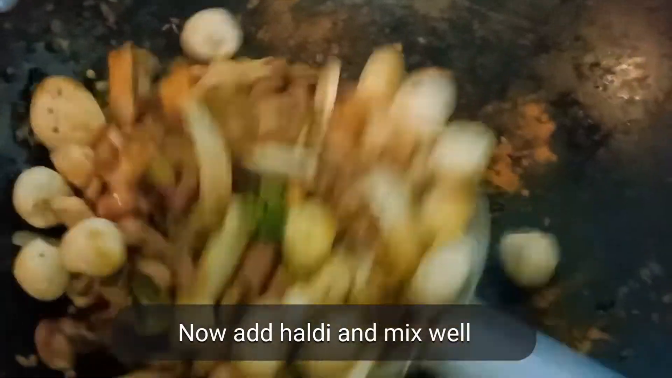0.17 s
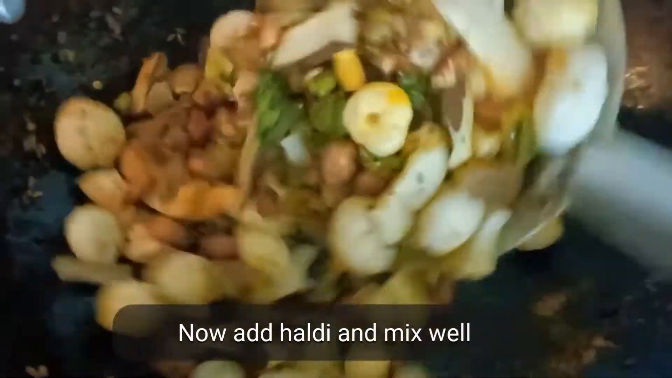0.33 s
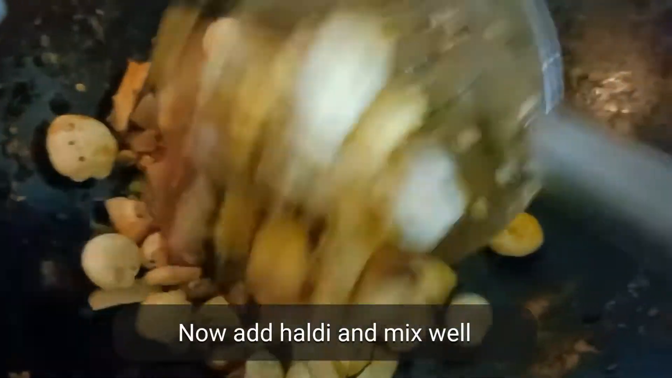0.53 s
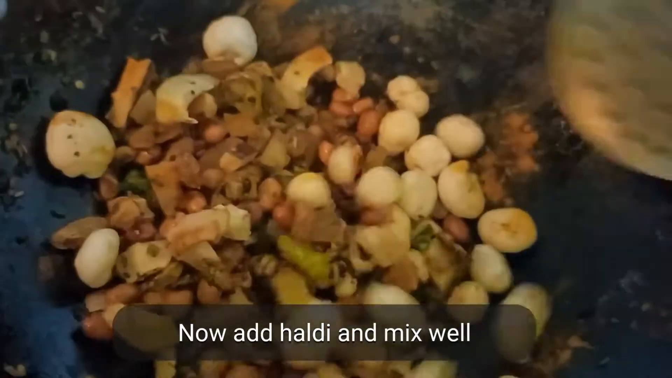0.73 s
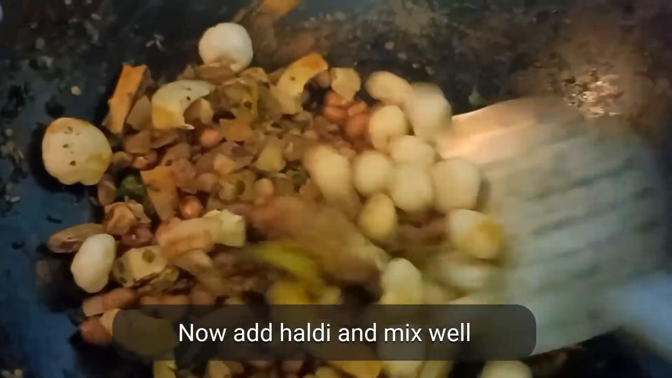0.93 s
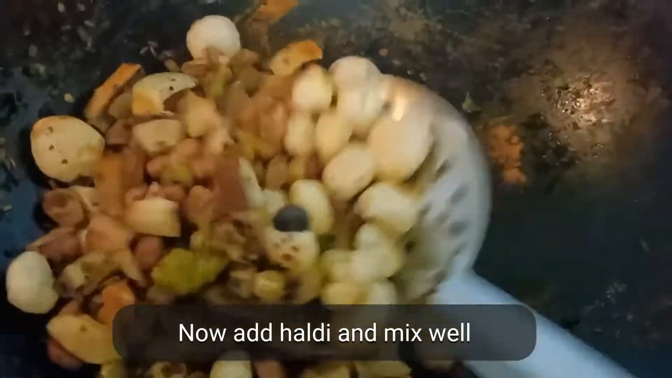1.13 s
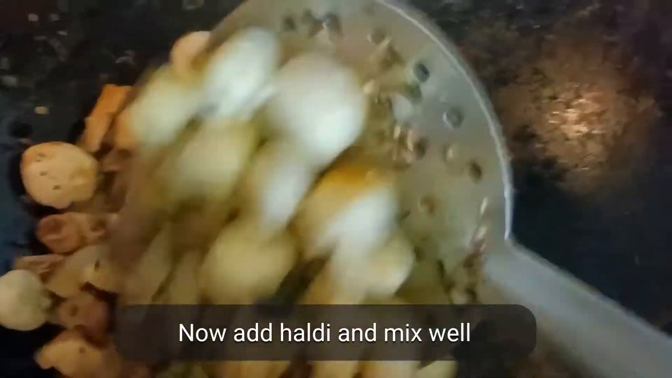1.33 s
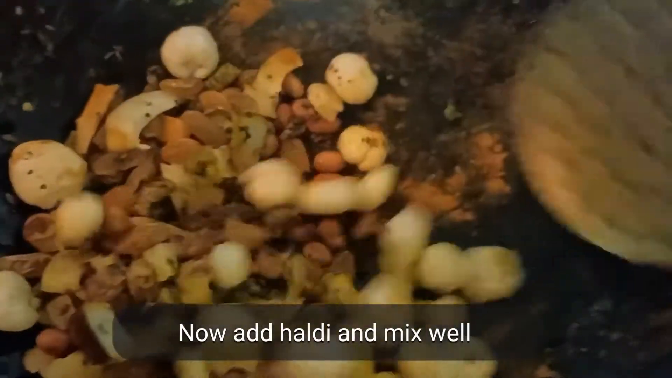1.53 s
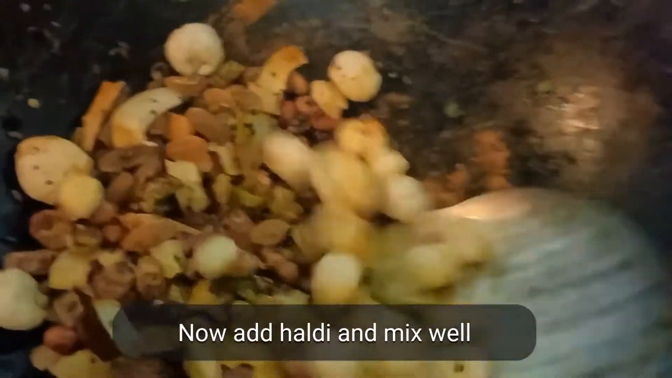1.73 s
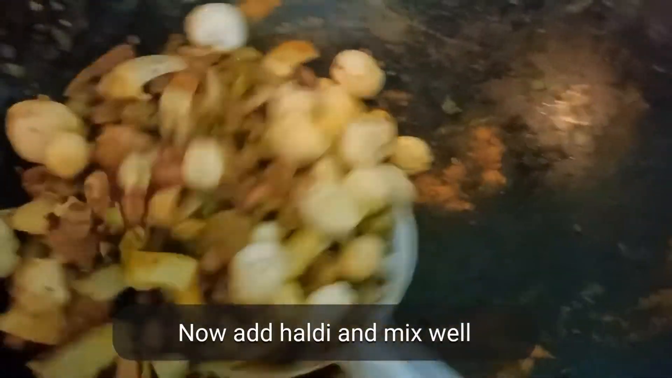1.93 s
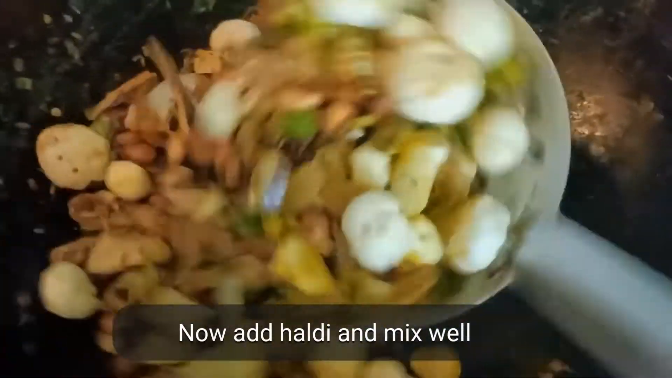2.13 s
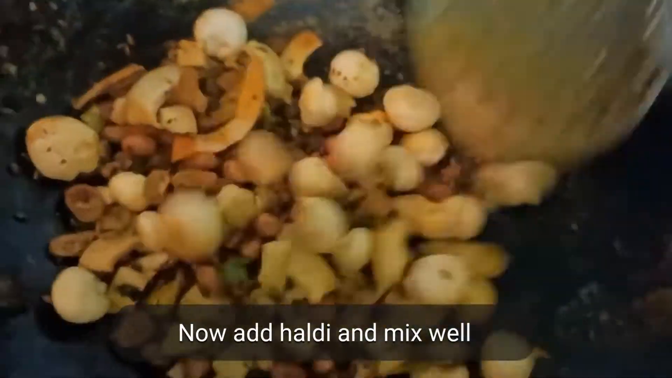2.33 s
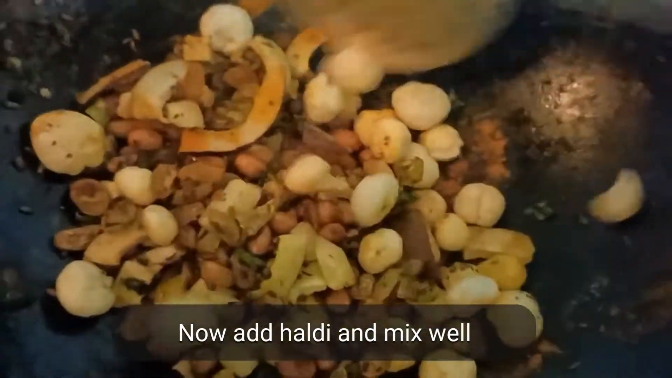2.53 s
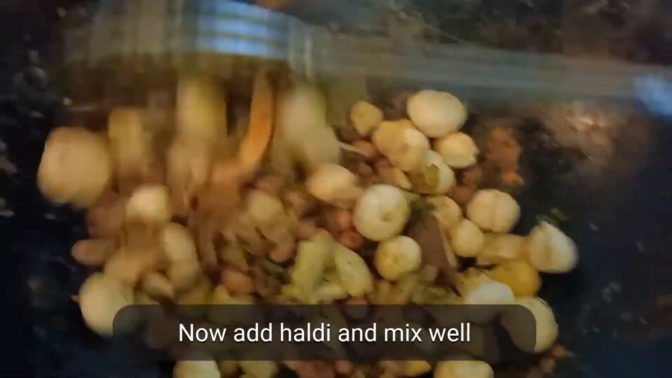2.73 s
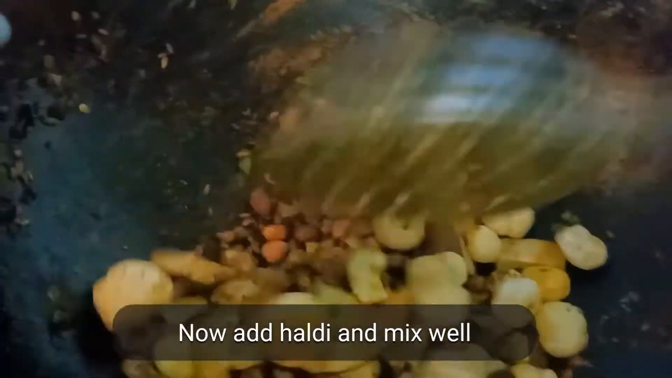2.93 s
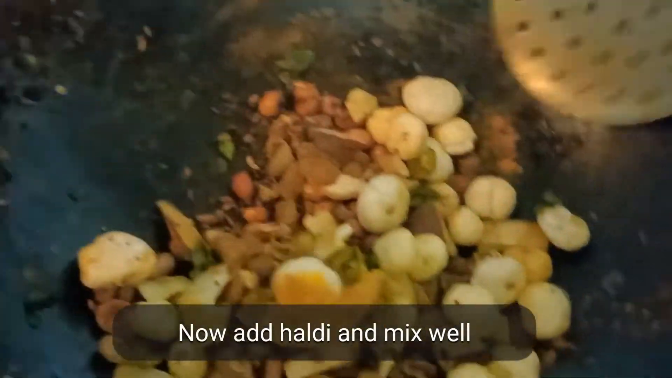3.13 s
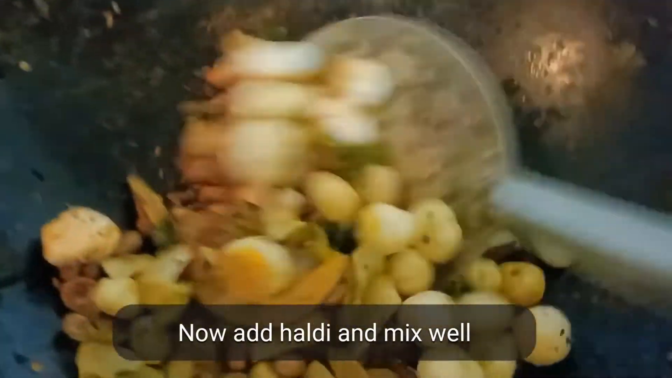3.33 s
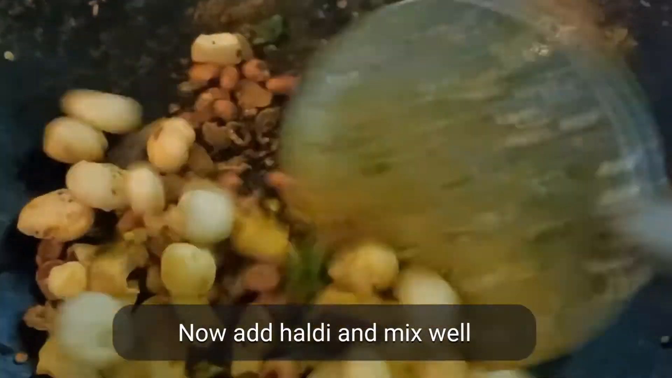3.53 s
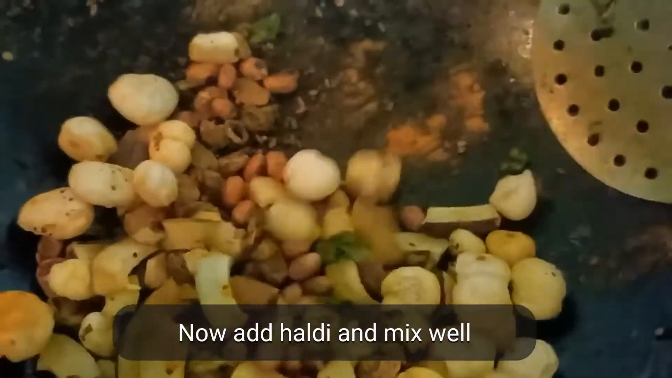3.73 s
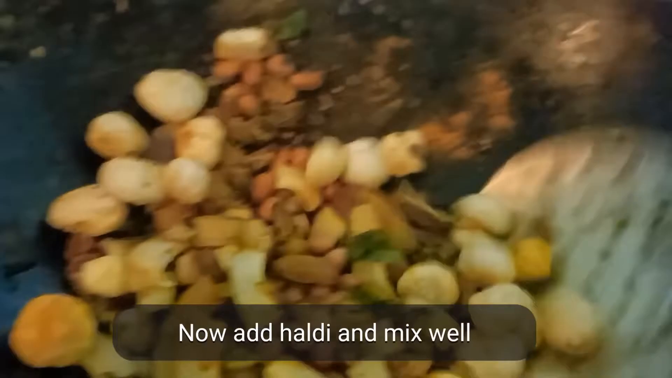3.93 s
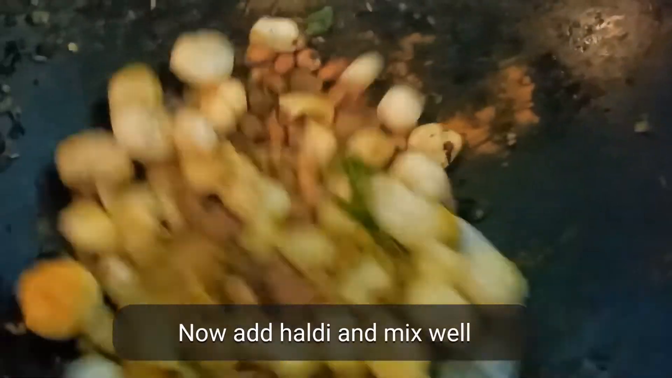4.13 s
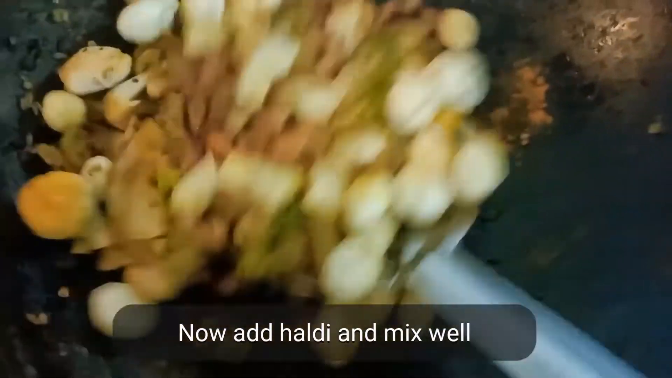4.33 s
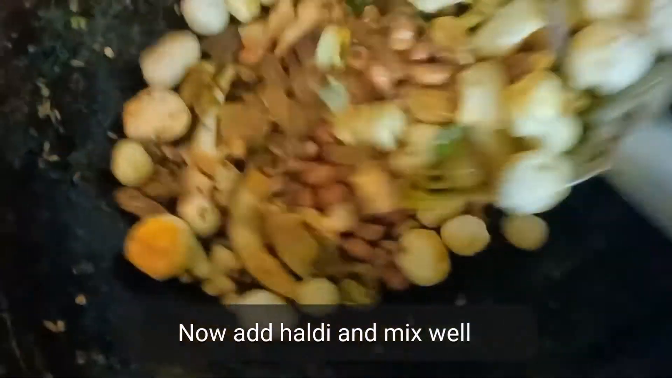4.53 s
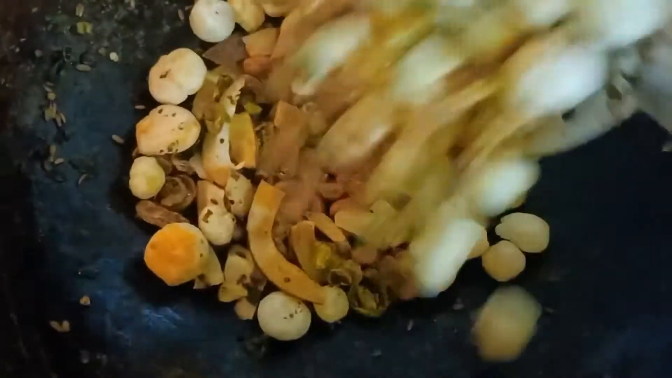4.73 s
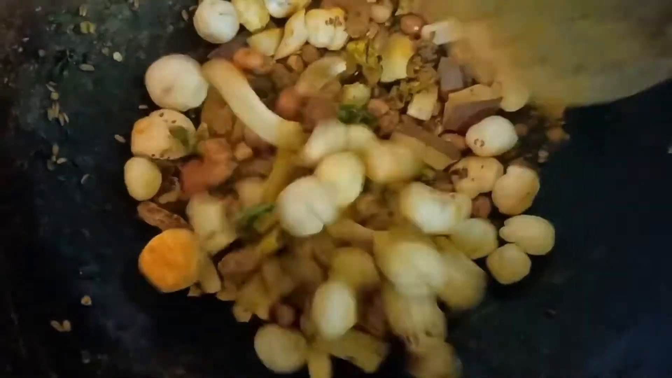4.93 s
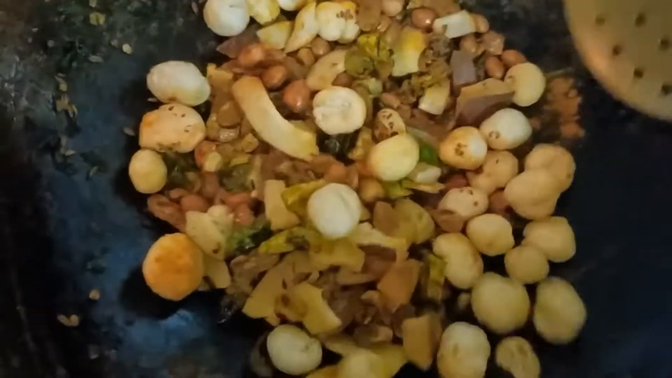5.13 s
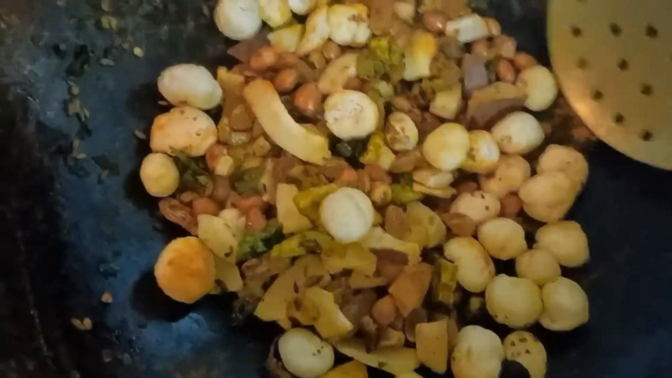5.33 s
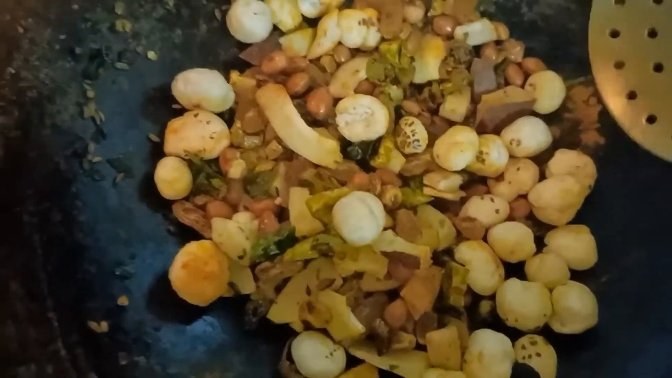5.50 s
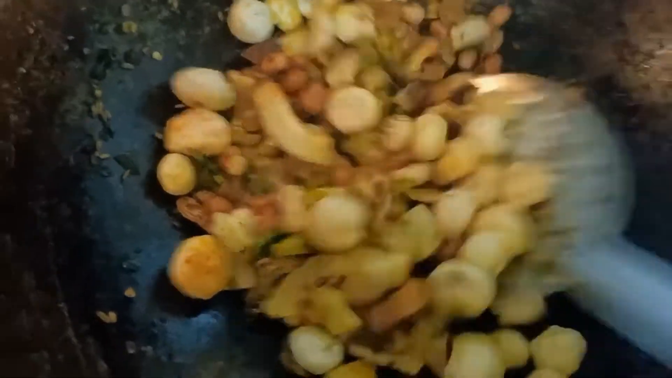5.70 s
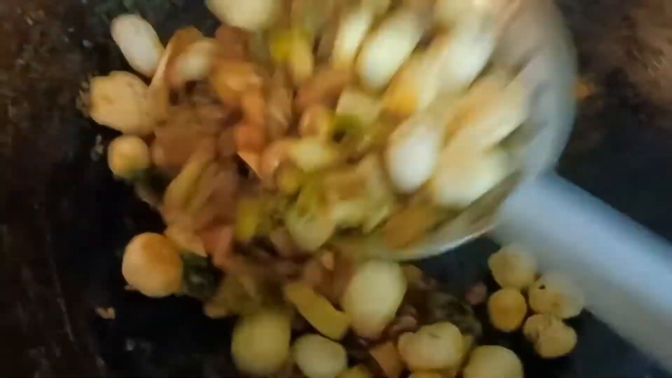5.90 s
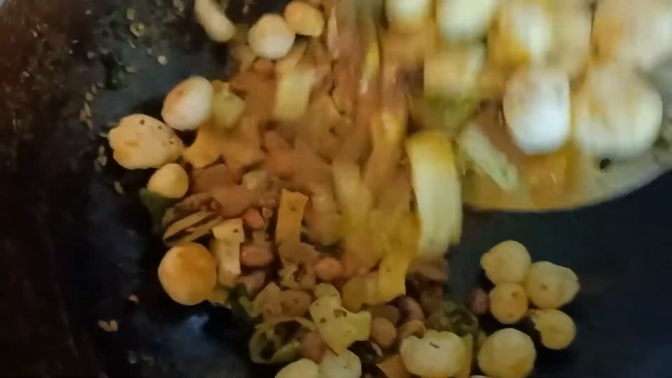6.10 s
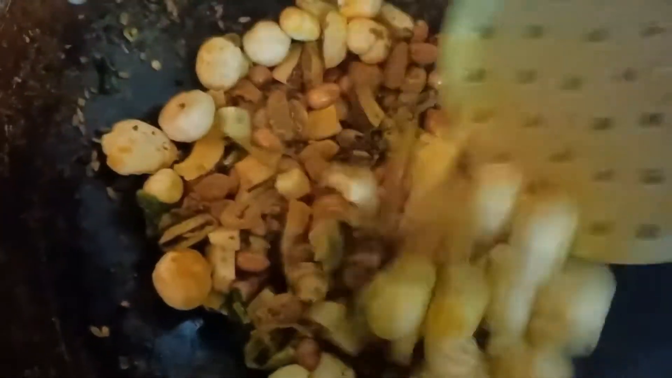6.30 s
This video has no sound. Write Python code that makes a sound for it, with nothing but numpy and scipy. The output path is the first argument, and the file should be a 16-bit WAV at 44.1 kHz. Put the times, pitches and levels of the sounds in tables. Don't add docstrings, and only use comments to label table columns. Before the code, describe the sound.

A steel spatula slaps and scrapes a hot metal pan, turning nuts and dry coconut that clatter, tick and tumble in a quiet kitchen.

```python
import sys
import numpy as np
from scipy import signal
from scipy.fft import rfft, irfft, next_fast_len
from scipy.io import wavfile
from scipy.ndimage import uniform_filter1d

SR = 44100
rng = np.random.default_rng(int(sys.argv[2]) if len(sys.argv) > 2 else 0)


def wav_out(sig):
    wavfile.write(sys.argv[1], SR, np.round(np.clip(np.atleast_2d(sig).T, -1, 1) * 32767).astype(np.int16))


def level_to_linear(level):
    exponent = np.asarray(level, float) / 20
    return 10 ** exponent


N = 284826
SIZE = next_fast_len(N + SR // 2)
HZ = np.fft.rfftfreq(SIZE, 1 / SR)

# frequency in Hz, level in dB per Hz.
KITCHEN = [(12, -35), (20, -8), (36, -1.5), (53, -17), (70, -5), (130, -5.5), (177, -14.5), (262, -20.5),
           (301, -17.5), (337, -25), (678, -24), (3500, -25), (10500, -31), (16000, -24)]
# frequency in Hz, likeness from 0 to 1.
ALIKE = [(30, 1), (100, 0.88), (300, 0.93), (1000, 0.56), (3400, 0.22), (5500, 0.19), (8000, 0.36),
         (12000, 0.7), (15000, 0.36)]
# frequency in Hz, left over right in dB.
LEAN = [(100, 0), (250, 2), (700, 2.5), (1400, -0.5), (5000, 0.5), (10000, -1)]
# start in seconds, peak in dB, pitch in Hz, left over right in dB.
CRUMBS = [(0.328, -40, 5200, 0), (0.627, -27, 11000, 0), (0.627, -33, 3500, -6), (0.938, -22, 6000, 0),
          (1.479, -34, 10000, 0), (1.5103, -28, 12000, -10), (1.5494, -31, 13800, -10),
          (2.12, -36, 12000, -2), (2.415, -36, 5000, -3), (2.4369, -27, 10500, 3), (3.083, -42, 12500, 2),
          (3.1004, -42, 10500, 6), (3.127, -42, 6900, 8), (3.465, -30, 14500, 0), (3.471, -27, 8000, 0),
          (3.471, -29, 12000, 0), (3.5275, -32, 3000, -4), (3.547, -31, 3200, 1), (3.81, -32, 2600, 5),
          (4.5425, -30, 2920, 8), (4.688, -28, 4100, -2), (4.8618, -19, 4200, 0), (4.914, -32, 13500, 0),
          (4.947, -25, 12500, 0), (4.969, -28, 13100, 0), (5.002, -29, 2400, 8), (5.094, -33, 12500, -2),
          (5.1376, -32, 5400, 4), (5.1376, -33, 11500, 0), (6.1728, -30, 5800, 6)]
# start in seconds, peak in dB.
SEEDS = [(0.0143, -20.5), (0.383, -37), (0.4184, -47), (0.559, -35), (0.636, -19), (0.665, -29),
         (0.689, -34), (0.7377, -36), (0.9625, -18), (1.0203, -16), (1.328, -34), (1.348, -45),
         (1.402, -34.5), (1.524, -31.5), (1.774, -19), (1.8355, -23), (2.2512, -28), (2.363, -31),
         (2.3826, -24), (3.3476, -22), (3.633, -31.5), (3.756, -39), (3.8275, -11), (3.9858, -40),
         (4.8604, -21), (4.9342, -20.5), (5.9023, -40), (6.341, -31), (6.392, -17.5), (6.35, -32),
         (6.43, -26.5)]
# start in seconds, peak in dB, # pitch
# in Hz, 60 dB decay in seconds, left over right in dB.
STEEL_TAPS = [(0.3279, -31, 5290, 0.16, 12), (0.328, -29, 5850, 0.082, 2), (0.328, -33, 6400, 0.066, 4),
              (0.329, -38, 4840, .08, 6), (0.419, -23, 5500, 0.015, 0), (1.3277, -9.5, 1835, 0.009, -3.5),
              (1.525, -21, 11000, 0.012, -3), (1.9924, -12.5, 10000, 0.0079, -4), (1.993, -14, 12200, .006, -4),
              (2.2531, -5, 4430, 0.004, 13.5), (2.439, -24.5, 2380, 0.016, 15), (3.47, -13, 5530, 0.0088, -1.5),
              (3.547, -16.5, 2100, 0.0041, -12), (3.606, -27, 5800, 0.012, -3), (3.7097, -25.5, 5900, 0.014, 1),
              (3.8266, -9, 3690, 0.038, 15), (4.0368, -6, 6290, 0.012, -3), (4.195, -8, 6700, 0.0086, 3),
              (4.203, -25.5, 1346, 0.051, 4), (4.5435, -34, 4800, 0.099, 24), (4.687, -29.5, 4840, 0.11, 12),
              (4.687, -30, 5390, 0.072, 1), (4.687, -27, 4300, 0.031, 14), (4.689, -30.5, 6300, 0.045, 2),
              (4.5433, -33, 7200, 0.033, 14), (4.837, -34, 7360, 0.056, 15), (4.94, -15, 5390, 0.069, 5),
              (4.944, -20, 4840, 0.096, 8), (4.946, -12.5, 2500, .012, -11), (3.22, -24, 3650, 0.16, 6),
              (4.809, -36, 7340, 0.031, 24), (4.8618, 0.5, 10260, 0.0022, -7), (4.8618, -11, 13500, 0.003, -2),
              (4.8618, -18, 6500, 0.0026, -7), (5.5952, -27, 4460, 0.026, 6), (5.931, -32, 3004, 0.064, 12),
              (6.29, -28, 11300, 0.015, -1.0), (6.381, 0.5, 2310, 0.0031, 2), (6.427, -19, 10660, 0.023, 4),
              (3.2175, -19, 11900, .012, 2),
    (3.218, -18, 4900, .02, 0),
    (3.2385, -22, 4400, .03, -2),
    (5.5135, -18.5, 4500, 0.033, 8),
    (5.514, -15.5, 7600, 0.019, 7),
    (5.513, -17, 11750, 0.053, -10),
    (5.518, -32, 3400, 0.15, 10),
    (5.515, -18, 5900, .025, 2),
]
# start in seconds, peak in dB, thump relative to it in dB,
# bottom ring relative to it in dB, clack pitch in Hz.
LANDINGS = [
    (0.8388, -9, -31, -27, 6290),
    (1.0843, -12, -17, -46, 5720),
    (1.67, -9, -12, -31.5, 4366),
    (2.4935, -16, -30, -23, 3600),
    (3.2158, -22.5, -2, -10.5, 5000),
    (3.239, -13.5, -49, -54, 5920),
    (3.8275, -13.5, -15, -26, 3870),
    (4.071, -12.5, -71, -48, 5740),
    (5.5125, -21, -14.5, -35.5, 7660),
    (5.514, -28, -40, -47, 11550),
]
# start in seconds, peak in dB, thump relative to it in dB,
# thump pitch in Hz, clack pitch in Hz.
KNOCKS = [(0.5245, -33.5, 11, 277, 3000), (0.5315, -34.5, 14.5, 546, 2300), (1.3275, -41.5, 6, 230, 1200),
          (0.556, -39, 14, 500, 2000), (0.46, -44.5, 9.5, 860, 2800), (0.576, -46.5, 9, 598, 1600),
          (0.598, -46, 10, 520, 1600), (0.94, -15.5, -45, 1600, 3150), (3.5, -49, -37, 1000, 5650),
          (4.2285, -9.5, -27, 1190, 5890), (4.9372, -14, -18, 1300, 5090)]
# mode in Hz, width in Hz, level in dB.
BOTTOM = [(204.5, 6.5, 9.5), (301, 16.6, 2), (382, 18, -8.5), (585, 43, -6), (853, 32, -13), (1110, 30, -6)]
# mode in Hz, width in Hz, level in dB.
PAN = [(214, 13.7, -6.5), (291.5, 41, -9), (385.7, 35, -5), (447, 45, -9.5), (610, 50, -5), (870, 80, -6),
       (1040, 80, -6)]
# mode in Hz, width in Hz, level in dB.
STEEL = [(5800, 46, 3.5), (3116, 130, -0.5), (3646, 49, 5.5), (6940, 33, 6.5), (4177, 32, 5),
         (4505, 36, 6.5), (4840, 14, 12.5), (5350, 13.3, 11), (5886, 32, 13.5), (6290, 69, 7),
         (11730, 60, 11), (7340, 46, 7), (8400, 79, -2.5), (8170, 54, 7.5), (9976, 74, 7), (7880, 82, 2),
         (9590, 460, 4), (11065, 64, 8), (12600, 17, -6), (11660, 400, 6), (12100, 49, 10.5),
         (15600, 230, -12)]
# frequency in Hz, level in dB per Hz.
GRIT = [(1410, -66), (2600, -1), (3350, 0), (4100, 8), (5610, 10.5), (6080, 10.5), (7230, 6), (7830, 8.5),
        (8300, 6.5), (8800, -8.5), (9500, -9), (10600, -2), (12900, 6.5), (15400, 2.5), (16000, -72)]
# frequency in Hz, level in dB per Hz.
CLATTER = [(900, -7.5), (1400, -6), (2300, 4.5), (3000, -0.5), (4000, -71)]
# frequency in Hz, level in dB per Hz.
SAND = [(6000, -35), (8500, -7), (11000, -3.5), (13200, -2.5), (15200, -4.5), (16000, -30)]
# start in seconds, rise in seconds, hold in seconds,
# level in dB, brightness in dB.
SCRAPES = [(0.0, 0.012, 0.047, -25, -0.5), (0.081, 0.013, 0.051, -30.5, -0.5),
           (0.935, 0.047, 0.037, -21.5, -4.5), (1.064, 0.0034, 0.0039, -26.5, -2),
           (1.672, 0.08, .14, -27.5, -1), (2.506, 0.082, 0.11, -28.5, 0.5),
           (2.703, 0.036, 0.13, -41.5, -6.5), (2.843, 0.035, 0.08, -48.5, 0),
           (3.268, 0.06, 0.052, -26.5, -3.5), (3.908, 0.033, 0.17, -26, -6.5),
           (4.144, 0.019, 0.017, -32.5, -7), (4.186, 0.038, 0.012, -26, -10),
           (4.902, 0.039, 0.0033, -33, -17), (5.627, 0.047, 0.055, -29.5, -2),
           (5.736, 0.015, 0.047, -36, -1.5), (2.67, 0.012, 0.076, -34.5, -2)]
# start in seconds, level in dB, brightness in dB,
# weight on the bottom in dB.
SKIDS = [
    (0.84, -27, -7.5, -9),
    (1.669, -27.5, -10, -5.5),
    (2.251, -37.5, -31, -18.5),
    (2.494, -23, -3, -13.5),
    (3.218, -28.5, -3, -3.5),
    (3.831, -25, -9, -6.5),
    (4.688, -46, -22, -11.5),
    (4.861, -41.5, 1.5, -13.5),
    (5.5135, -37, -7, -38),
    (5.593, -43.5, 1, -14.5),
]
# start in seconds, peak in dB, brightness in dB.
CATCHES = [(0.0138, -5.5, -13), (0.0324, -10, 3), (0.1004, -2.5, -13), (0.3256, -28, -16), (0.626, -28, 6),
           (0.924, -17.5, -15), (0.937, -12, -7), (0.96, -8, -8), (1.141, -21, -8), (1.479, -44, -4),
           (1.492, -45, -4), (1.505, -40, 8), (1.7734, -22, -2), (1.8354, -9, -11), (1.8964, -22, -6),
           (2.334, -35, 6), (2.342, -36, 10), (2.5627, -10, -15), (2.604, -12, -2), (2.7114, -15.5, 8),
           (3.237, -14.5, -0.5), (3.3013, -17, 0), (3.47, -28, -3), (3.5996, -33, 5), (3.7548, -38.5, 11),
           (3.921, -7.5, -9), (3.9373, -6.5, -6), (3.976, -14, 1.5), (4.036, -8, -1), (4.065, -8, -18),
           (4.092, -4, -18), (4.23, -8.5, -11), (4.9114, -23, -13), (4.938, -18, -4), (5.628, -33, 2),
           (5.64, -19, 4.5), (5.6594, -20, 6), (5.767, -14.5, -8), (6.1644, -38, -4), (6.288, -39, 13),
           (6.4268, -24, -2)]
# start in seconds, rise in seconds, hold in seconds, level in dB,
# sandy hiss relative to it in dB.
POURS = [(0.306, 0.11, 0.013, -46, -13), (0.601, 0.016, 0.01, -58, 14), (0.618, 0.0037, 0.072, -43, 6),
         (0.756, 0.016, 0.01, -47, -10), (1.468, 0.031, 0.031, -49, 7), (1.545, 0.014, 0.12, -55, 4),
         (2.086, 0.054, 0.1, -59, -11), (2.308, 0.07, 0.0082, -40.5, 3.5), (2.471, 0.014, .004, -47.5, 7),
         (3.586, 0.027, 0.054, -56, 7), (3.705, 0.02, 0.031, -63, 6), (4.054, 0.0077, 0.011, -28, -22),
         (4.473, 0.04, .004, -47, -8), (4.909, 0.019, 0.066, -45, 3.5), (4.971, 0.032, 0.013, -43.5, -0.5),
         (5.104, .02, 0.027, -58, -1), (5.82, 0.016, 0.071, -56, 3), (6.131, 0.032, 0.007, -49.5, 5),
         (6.262, 0.11, 0.062, -44.5, 1.5)]
# start in seconds, rise in seconds, hold in seconds,
# level in dB.
PRESSES = [(0.0, 0.0075, 0.11, -40.5), (0.09, 0.046, 0.37, -57.5), (0.53, 0.013, 0.092, -58),
           (0.921, 0.051, 0.044, -39), (1.072, 0.0083, 0.013, -58), (1.724, 0.029, 0.15, -46.5),
           (1.772, 0.015, 0.02, -44), (2.68, 0.011, 0.072, -51.5), (4.02, 0.022, 0.049, -70),
           (4.224, .01, 0.024, -51.5), (2.535, 0.029, 0.12, -45.5), (3.29, 0.027, 0.058, -42),
           (3.932, 0.021, 0.21, -48.5), (4.194, .04, 0.027, -60), (4.566, 0.028, 0.039, -57.5),
           (5.627, 0.064, 0.054, -46.5), (5.755, 0.025, 0.04, -50)]
# time in seconds, level in dB.
SETTLING = [(0, -51), (.5, -50.5), (.61, -55.5), (1.1, -65), (1.25, -55), (1.6, -54), (2.2, -53),
            (2.9, -51.5), (3.1, -63.5), (3.25, -77), (3.5, -53), (3.7, -54.5), (4.4, -52), (4.85, -56),
            (5.2, -69), (5.5, -66.5), (5.9, -50.5), (6.46, -57.5)]
# time in seconds, place from the pan's middle (0) up its wall (2)
CONTACT = [(0, 1.5), (.3, 1.1), (.7, 1.03), (.95, 0.52), (1.2, 0.87), (1.7, 1.1), (1.95, 1.13), (2.5, 0.92),
           (2.62, 2.76), (2.8, 2.74), (3.2, 0.72), (3.45, 0.81), (3.9, 0.72), (4.15, 0.57), (4.6, 0.9),
           (4.95, 0.49), (5.55, 1.2), (5.8, 1.54), (6.46, 0.67)]
# frequency in Hz, level in dB.
PLACES = [
    [(3000, 4.5), (4400, 3), (6200, -10), (8700, -11), (12500, 3.5)],
    [(3000, 3), (4400, 0), (6200, 1), (8700, -0.5), (12500, 0.5)],
    [(3000, -1), (4400, 0), (6200, -1.5), (8700, -5.5), (12500, -1)],
    [(3000, -6.5), (4400, -1), (6200, 5), (8700, 2.5), (12500, -3.5)],
]


def unit(x):
    return x / np.sqrt(np.mean(x ** 2) + 1e-20)


def along(points):
    f, v = np.transpose(points)
    return np.interp(np.log(HZ + 1), np.log(f + 1), v)


def filtered(x, response):
    return irfft(rfft(x, SIZE) * response, SIZE)[..., :N]


def causal(gain):
    cepstrum = irfft(np.log(gain + 1e-6), SIZE)
    cepstrum[1:SIZE // 2] *= 2
    cepstrum[SIZE // 2 + 1:] = 0
    return np.exp(rfft(cepstrum))


def modes(table, flip=-1):
    response = 0
    for k, (centre, width, db) in enumerate(table):
        resonance = 1j * HZ * width / (centre * centre - HZ * HZ + 1j * HZ * width)
        response = response + flip ** k * level_to_linear(db) * resonance
    return response


def patchy(x, depth_db, size, count=8000):
    spectrum = signal.stft(x, nperseg=size)[2]
    field = uniform_filter1d(rng.standard_normal(spectrum.shape[-2:]), size=3, axis=0)
    field = uniform_filter1d(field, size=count // size, axis=1)
    return signal.istft(spectrum * level_to_linear(depth_db * unit(field)), nperseg=size)[1][..., :N]


def grains(per_s, spread_db, smooth):
    struck = rng.random((2, N)) < per_s / SR
    sizes = level_to_linear(spread_db * rng.uniform(-0.18, 1, N)) * rng.standard_normal((2, N))
    return unit(struck * sizes) + smooth * rng.standard_normal((2, N))


def lead():
    return np.exp(1j * np.pi * np.clip(HZ / 6690, 0, 1) * np.array([[1], [-1]]))


def ports(pair):
    turn = np.arccos(np.clip(along(ALIKE), 0, 1)) / 2
    sign = np.array([[1], [-1]])
    shared, own = rfft(pair, SIZE)
    mixed = np.cos(turn) * shared + sign * np.sin(turn) * own
    return irfft(mixed * level_to_linear(sign * along(LEAN) / 2) * lead(), SIZE)[:, :N]


def sides(pan_db):
    return level_to_linear([[pan_db / 2], [-pan_db / 2]])


def room(x):
    t = np.arange(SR // 3) / SR
    tail = rng.standard_normal((2, len(t))) * level_to_linear(-60 * t / 0.19) * (t > .003)
    return signal.fftconvolve(x, tail / np.linalg.norm(tail[0]), axes=1)[:, :N]


def kitchen():
    air = filtered(rng.standard_normal((2, N)), level_to_linear(along(KITCHEN)))
    return level_to_linear(-58.5) * unit(patchy(air, depth_db=1.5, size=256))


def crumbs():
    out, t = np.zeros((2, N + SR)), np.arange(SR // 40) / SR
    for s, db, hz, pan_db in CRUMBS:
        i = round(s * SR)
        rough = unit(uniform_filter1d(rng.standard_normal(len(t)), size=8))
        tick = level_to_linear(db - 0.5 - 60 * t / 0.0035) * rough * np.sin(2 * np.pi * hz * t)
        out[:, i:i + len(t)] += sides(pan_db) * tick
    return filtered(out[:, :N], lead())


def seeds():
    taps, t = np.zeros((2, N + SR)), np.arange(SR // 50) / SR
    for s, db in SEEDS:
        i = round(s * SR)
        taps[:, i:i + len(t)] += level_to_linear(db - 16.0 - 60 * t / 0.018) * rng.standard_normal((2, len(t)))
    husk = modes([(1410, 2300, 1.4), (2460, 490, 27.0), (3850, 960, 6.0)])
    return filtered(taps[:, :N], husk)


def nuts(steel):
    tock, tick, t = np.zeros((2, N + SR)), np.zeros((2, N)), np.arange(SR // 8) / SR
    for s, db, hz, t60, pan_db in STEEL_TAPS:
        i, side = round(s * SR), sides(pan_db)
        fading = level_to_linear(-6 - 60 * t / max(t60, .002)) + level_to_linear(-51.0 - 60 * t / 0.0096)
        onset = 1 - np.exp(-t / 0.00025)
        tock[:, i:i + len(t)] += side * level_to_linear(db) * fading * onset * np.sin(2 * np.pi * hz * t)
        tick[:, i] = side[:, 0] * level_to_linear(db - 27 + rng.normal(0, 1.5, size=2))
    return filtered(tock[:, :N] + filtered(tick, steel), lead())


def landings(steel):
    burst, tones, blow = np.zeros((2, N + SR)), np.zeros((2, N + SR)), np.zeros((2, N))
    t = np.arange(SR // 8) / SR

    def wavering(depth, size):
        return 1 + depth * unit(uniform_filter1d(rng.standard_normal((2, len(t))), size=size))

    flat = [(s, db, thump, ring, 333, clack) for s, db, thump, ring, clack in LANDINGS]
    glancing = [(s, db, thump, -50, low, clack) for s, db, thump, low, clack in KNOCKS]
    for s, db, thump_db, ring_db, thump_hz, clack_hz in flat + glancing:
        i = round(s * SR)
        chatter_and_crack = level_to_linear(-60 * t / 0.018) + 1.3 * level_to_linear(-60 * t / 0.0021)
        burst[:, i:i + len(t)] += level_to_linear(db) * chatter_and_crack * rng.standard_normal((2, len(t)))
        clack = level_to_linear(db - 12.5 - 60 * t / 0.081) * wavering(1.18, size=20)
        clack = clack * np.sin(2 * np.pi * clack_hz * t)
        thump = level_to_linear(db + thump_db - 10.0 - 60 * t / 0.12) * wavering(0.53, size=150)
        thump = thump * np.sin(2 * np.pi * thump_hz * t) * (1 - np.exp(-t / 0.0014))
        tones[:, i:i + len(t)] += (clack + thump) * [[1], [.5]]
        blow[:, i] = level_to_linear(db + ring_db + 55) * np.array([1, .4])
    return level_to_linear(-23.0) * filtered(burst[:, :N], steel) + tones[:, :N] + filtered(blow, modes(BOTTOM))


def efforts():
    t = np.arange(0, N / SR + .001, .001)

    def swell(s, rise, hold, db, fall):
        held = db - 7.5 * hold
        return np.interp(t, np.cumsum([s, rise, hold, 1]), [db - 18, db, held, held - fall], left=-200)

    no_sand = -80
    moves = [(np.interp(t, *np.transpose(SETTLING)), (-3, -13, -12.5, -2.5))]
    for *push, bright in SCRAPES:
        moves.append((swell(*push, fall=239), (bright, -31, -18.5, no_sand)))
    for s, db, bright, weight in SKIDS:
        moves.append((swell(s - .002, 0.0013, 0.0011, db, fall=346), (bright, weight, -87, no_sand)))
    for s, db, bright in CATCHES:
        moves.append((swell(s - .001, 0.0017, 0.0019, db - 17.5, fall=710), (bright, -19, -31, no_sand)))
    for *slide, sandy in POURS:
        moves.append((swell(*slide, fall=170), (-7.5, -18, -5.5, sandy)))
    for press in PRESSES:
        moves.append((swell(*press, fall=239) - 30, (0, 30, 0, 0)))
    power = sum(level_to_linear(db + np.array([0, *colour])[:, None]) ** 2 for db, colour in moves)
    return [np.interp(np.arange(N) / SR, t, layer) for layer in np.sqrt(power)]


def wandering(force):
    place = np.clip(np.interp(np.arange(N) / SR, *np.transpose(CONTACT)), 0, 3)
    nearness = np.clip(1 - np.abs(place - np.arange(4)[:, None]), 0, 1)
    share = np.sin(np.pi / 2 * nearness)
    angles = 2.4 * np.arange(len(STEEL)) + 2 * np.pi * np.arange(4)[:, None] / 3
    crowd = uniform_filter1d(rng.standard_normal((4, len(HZ))), size=500)
    crowd = uniform_filter1d(crowd, size=500)
    rest_gains = level_to_linear(along(GRIT) - 6.5 + 4 * unit(crowd))
    out = 0
    for part, row, gain, tone in zip(share, angles, rest_gains, PLACES):
        gripped = [(hz * (1 + 0.0046 * np.sin(a)), width, db - 0.5 * np.cos(a))
                   for (hz, width, db), a in zip(STEEL, row)]
        response = modes(gripped) + causal(gain) * np.exp(1j * row[0])
        out = out + filtered(part * force, level_to_linear(along(tone)) * response)
    return out


def stirring(steel):
    rubbing, fine, weight, rolling, sifting = efforts()
    high = 1 / (1 + (7500 / (HZ + 1)) ** 12)

    def driven(force, level, response, later=1):
        return filtered(level * unit(force), response / np.sqrt(np.mean(np.abs(later * response) ** 2)))

    chatter = level_to_linear(0.99 * unit(uniform_filter1d(rng.standard_normal(N), size=120)))
    grit = driven(chatter * grains(3000, 13.4, 0.99), rubbing, 1 - high, steel)
    fine_grains = grains(4000, 3.0, 0.77) + 0.26 * grains(70, 3.6, .01)
    hiss = driven(chatter * fine_grains, fine, high, steel)
    body = driven(grains(650, 19.6, 1.0), weight, modes(PAN, flip=0.8))
    clatter = driven(chatter * grains(500, 25.0, 0.9), rolling, causal(level_to_linear(along(CLATTER))))
    sand = driven(grains(2500, 10.0, 0.78), sifting, level_to_linear(along(SAND)))
    crunchy = patchy(wandering(grit + hiss) + level_to_linear(-2.0) * sand, depth_db=2.0, size=128, count=1024)
    scraping = patchy(crunchy, depth_db=3.0, size=512, count=6000)
    return scraping + patchy(body + clatter, depth_db=4.0, size=1024)


def scene():
    steel = modes(STEEL) + causal(level_to_linear(along(GRIT) - 4.0))
    blade_and_air = stirring(steel) + landings(steel) + kitchen()
    pan = level_to_linear(2.5) * ports(blade_and_air) + nuts(steel) + seeds() + crumbs()
    return pan + level_to_linear(-9.5) * room(pan)


def top_cut(x):
    return signal.sosfilt(signal.butter(12, 16480, fs=SR, output="sos"), x)


def record(dry):
    top = 1 / (1 + (HZ / 16000) ** 70)
    return top_cut(filtered(dry, top))


dry = scene()
out = record(dry)
wav_out(out)
```